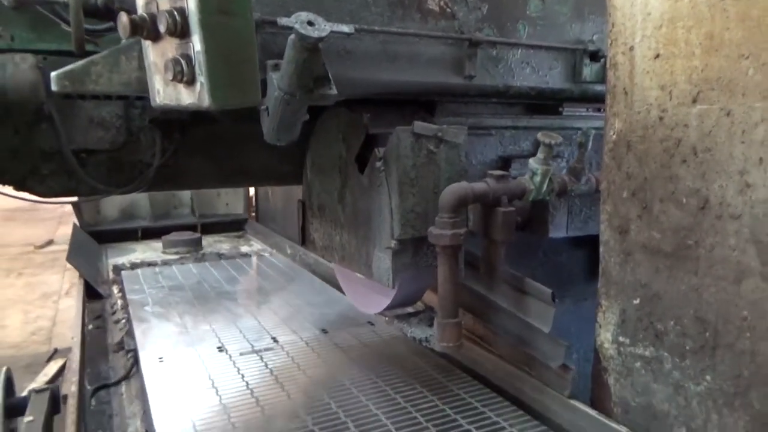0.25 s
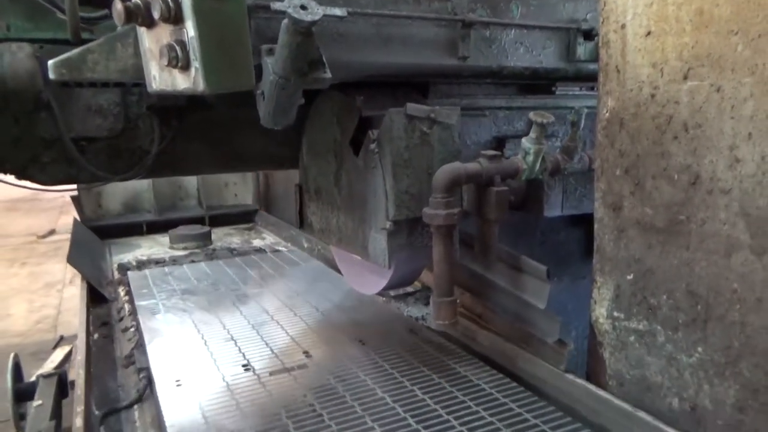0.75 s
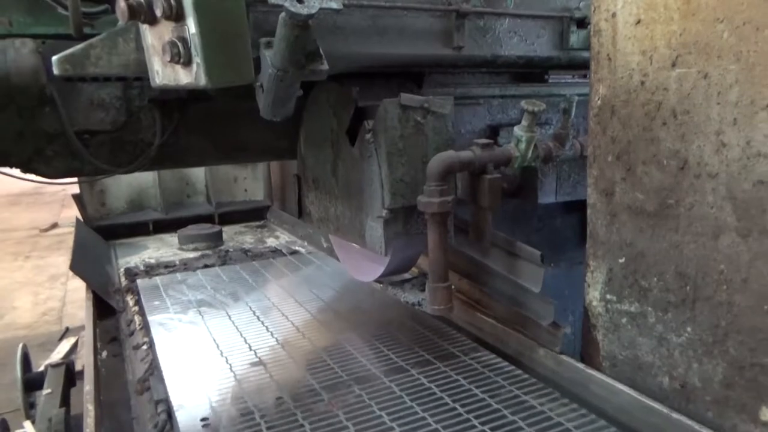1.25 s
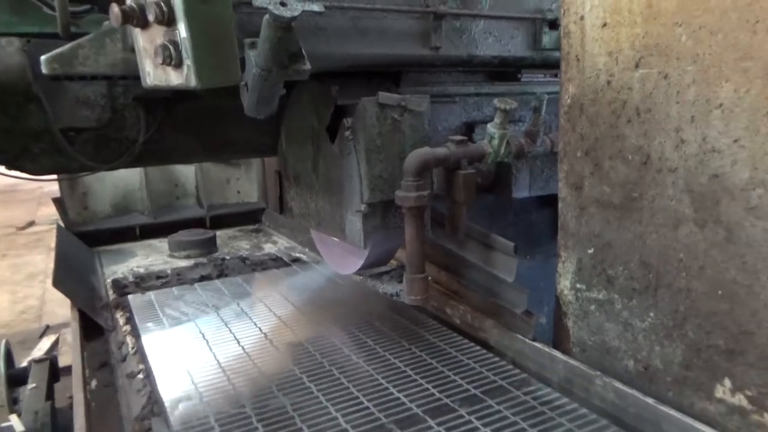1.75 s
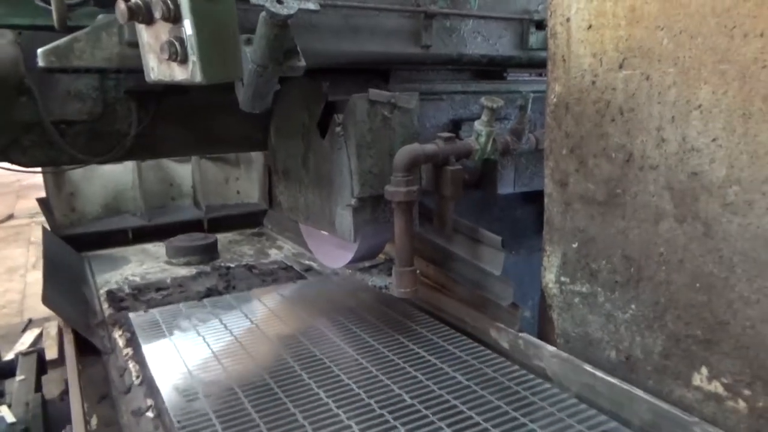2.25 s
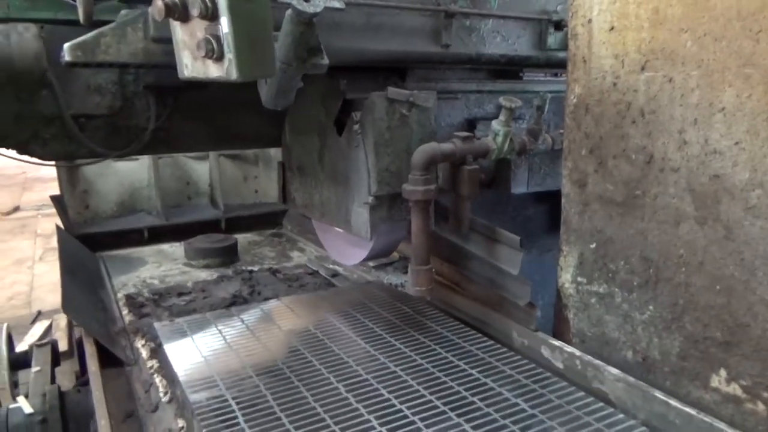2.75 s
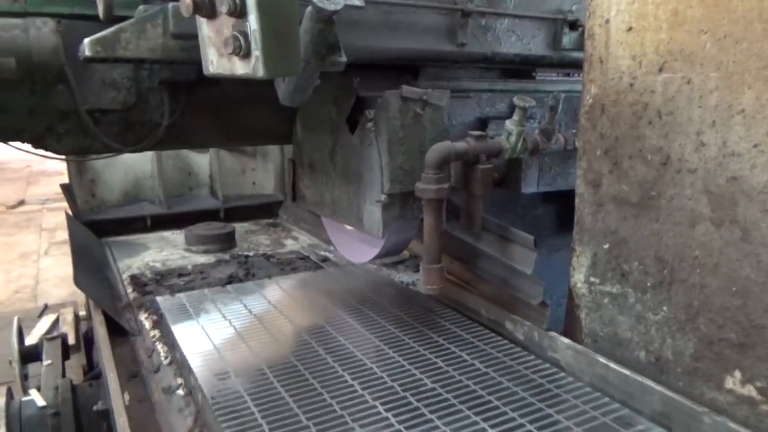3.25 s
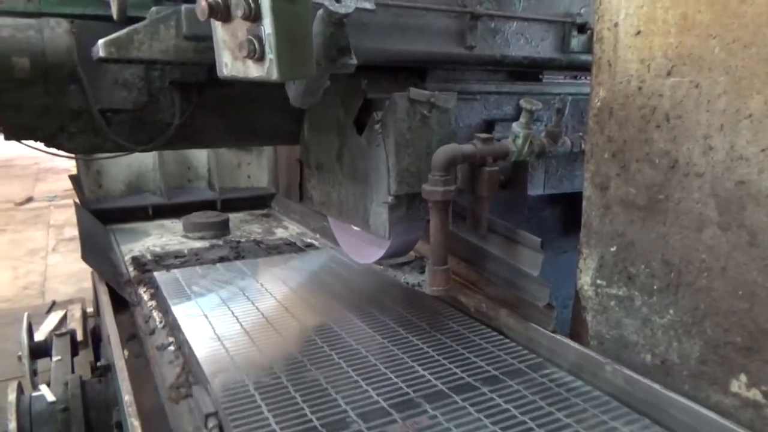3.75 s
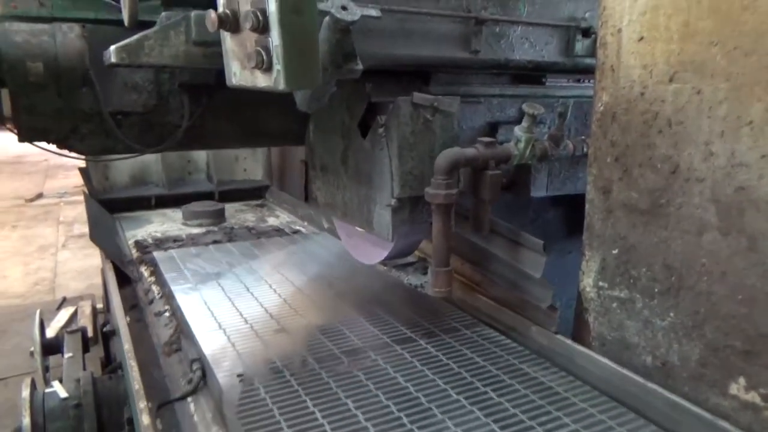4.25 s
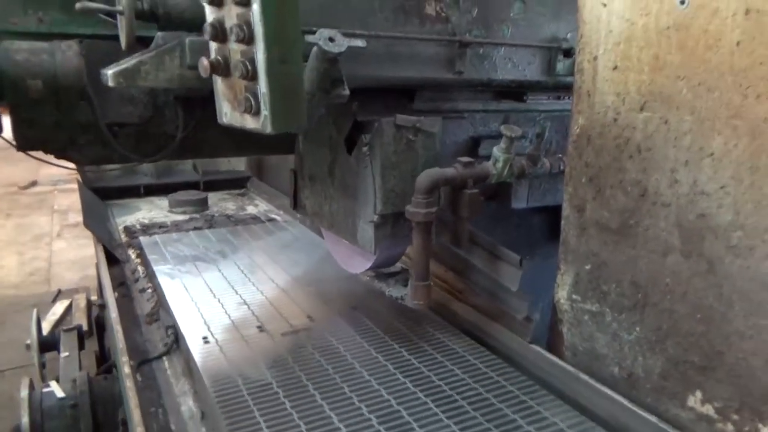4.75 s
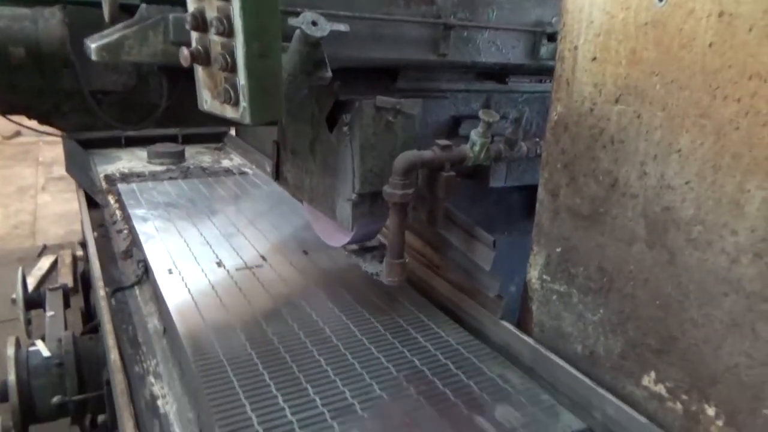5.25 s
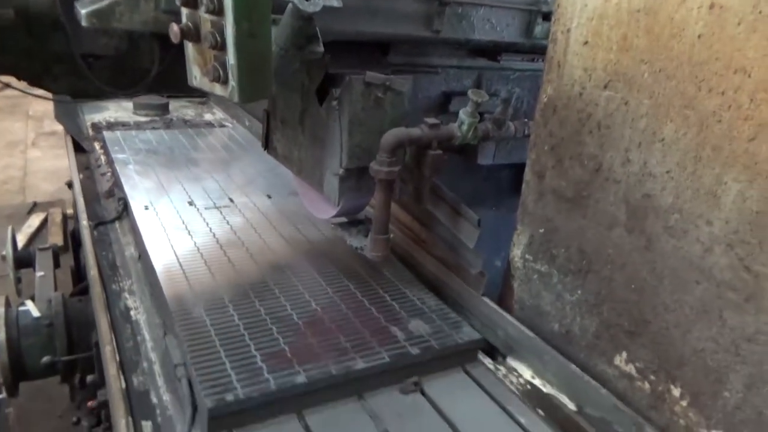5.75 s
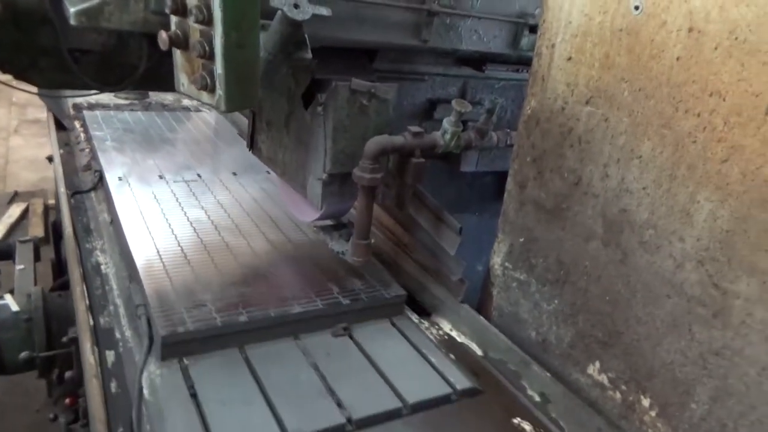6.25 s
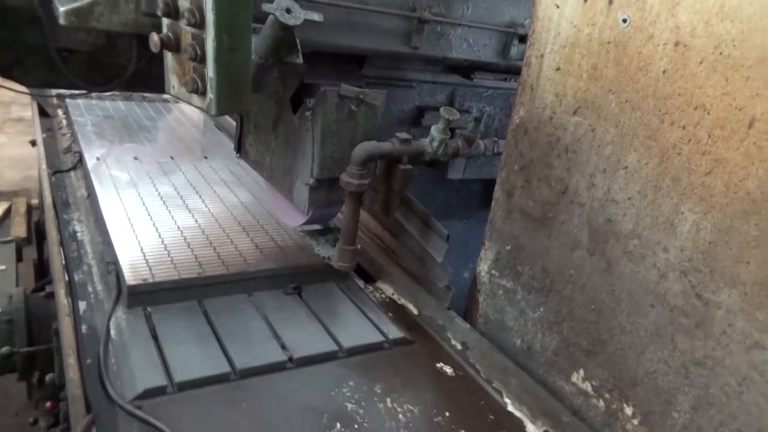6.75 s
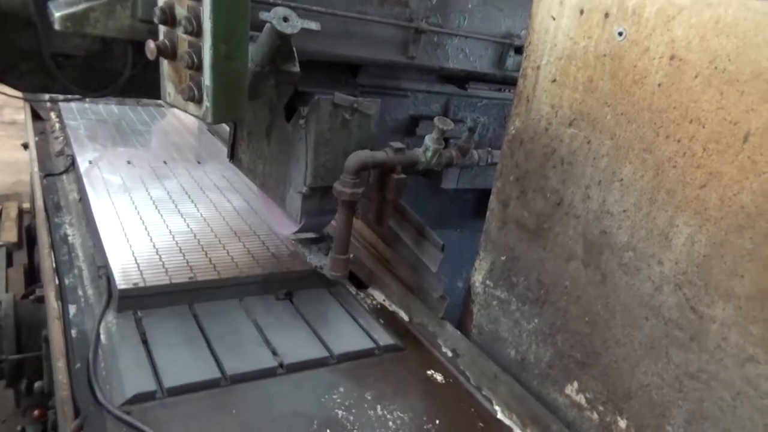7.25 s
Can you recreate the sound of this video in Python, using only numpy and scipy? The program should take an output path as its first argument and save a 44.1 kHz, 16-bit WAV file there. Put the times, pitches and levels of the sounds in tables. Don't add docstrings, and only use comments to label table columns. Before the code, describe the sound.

A big surface grinder idles in a hard, reverberant workshop while its table slides. A hydraulic pump whines steadily on many overtones that swell, fade and flutter separately. Broad hiss lies beneath. A tick and a hard knock surround a table reversal near 2.6 seconds, when the pitch jumps slightly and beats; a clack and second jump come near the end. Close stereo pickup.

```python
import sys
import numpy as np
from scipy import signal
from scipy.fft import next_fast_len
from scipy.io import wavfile
from scipy.ndimage import uniform_filter1d

SR = 44100
rng = np.random.default_rng(int(sys.argv[2]) if len(sys.argv) > 2 else 0)


def int16_out(signal):
    q = np.round(np.clip(np.atleast_2d(signal).T, -1, 1) * 32767)
    wavfile.write(sys.argv[1], SR, q.astype(np.int16))


def voltage_ratio(decibels):
    exponent = np.asarray(decibels, float) / 20
    return 10 ** exponent


N = 330309
STEP = 32
TEETH, IDLE_HZ = 13, 380.25


def read(points, hz):
    f, value = np.transpose(points)
    return np.interp(np.log(hz + 1), np.log(f + 1), value)


def evened(x):
    return x / np.sqrt(np.mean(abs(x) ** 2, -1, keepdims=True) + 1e-20)


def drift(count, size, hz):
    f = np.fft.fftfreq(size, STEP / SR)
    z = rng.standard_normal((count, size)) + 1j * rng.standard_normal((count, size))
    return evened(np.fft.ifft(z / (1 + (f / hz) ** 4)))


# time in seconds, level in dB.
GAIN = [(0, -36.5), (.04, -38.5), (.44, -36.5), (1.3, -35.5), (2.23, -35.5), (2.84, -36), (3.08, -37.5),
        (3.6, -35), (4.1, -36.5), (4.3, -40), (4.53, -36), (4.71, -38.5), (5.0, -37), (5.9, -38),
        (6.06, -42.5), (6.42, -42), (6.45, -38.5), (7.49, -36.5)]


def gain_control(t):
    seconds, db = np.transpose(GAIN)
    level_db = np.interp(t, seconds, db)
    return level_db, level_db - level_db.mean()


def bells(rows, hz, t):
    total = 0
    for s, crest_hz, db, half_s in rows:
        if abs(crest_hz - hz) < IDLE_HZ / 2:
            total = total + voltage_ratio(db) * np.exp(-((t - s) / half_s) ** 2)
    return total


# time in seconds, overtone in Hz, half length in seconds.
NODES = [(2.605, 380, 0.027), (2.835, 380, 0.026), (3.01, 380, 0.018), (3.493, 380, 0.017),
         (6.92, 380, 0.043), (7.28, 380, 0.086), (2.645, 760, .06), (2.725, 760, 0.054), (2.89, 760, 0.017),
         (7.1, 760, .015), (7.19, 760, .015), (6.96, 1140, .015), (7.1, 1140, .025), (5.79, 760, 0.03),
         (7.008, 760, 0.043), (3.02, 1140, 0.027), (3.648, 1140, 0.054), (4.25, 1140, 0.044),
         (5.838, 1140, 0.045), (7.426, 1140, 0.027), (2.02, 1520, 0.044), (2.17, 1520, .03),
         (2.8, 1520, 0.015), (6.38, 1520, .05), (3.03, 1520, 0.041), (3.23, 1520, 0.048), (3.4, 1520, .03),
         (3.86, 1520, 0.066), (5.193, 1520, 0.04), (1.75, 1900, 0.036), (3.353, 1900, 0.022),
         (3.68, 1900, 0.043), (4.55, 1900, 0.063), (5.59, 1900, 0.11), (4.4, 2280, 0.13), (4.25, 2660, .06),
         (0.48, 3040, .06), (4.9, 3040, 0.12), (6.1, 3420, .08), (5.4, 3800, 0.054), (4.6, 4180, .1),
         (0.69, 4940, .1)]


def nodes(hz, t, leak=0.24):
    factor = 1
    for s, node_hz, half_s in NODES:
        if abs(node_hz - hz) < IDLE_HZ / 2:
            passed = (t - s) / half_s
            factor = factor * (np.tanh(passed) + 1j * leak / np.cosh(passed))
    return factor


# time in
# seconds, overtone in Hz, level in dB, half length in seconds.
OVERTONE_CRESTS = [(0.16, 380, -15, 0.29), (0.83, 380, -22, 0.19), (1.25, 380, -24.0, 0.76),
                   (2.103, 380, -20.5, 0.34), (2.723, 380, -18.5, 0.15), (3.084, 380, -19, 0.38),
                   (3.746, 380, -22, 0.12), (4.216, 380, -15.5, 0.35), (4.882, 380, -20.5, 0.53),
                   (5.53, 380, -20.5, 0.13), (5.784, 380, -17.5, 0.11), (6.284, 380, -11, 0.38),
                   (6.796, 380, -26.5, 0.074), (7.08, 380, -21, 0.15), (7.444, 380, -30, 0.094),
                   (0.75, 760, -22.5, 0.92), (1.66, 760, -22, 0.51), (2.177, 760, -22, 0.26),
                   (2.53, 760, -20, 0.14), (2.9, 760, -23, 0.15), (3.8, 760, -22.0, 0.7),
                   (4.52, 760, -31, 0.087), (5.18, 760, -19.5, 0.95), (6.72, 760, -29, 0.26),
                   (6.902, 760, -27, 0.064), (7.46, 760, -28.5, 0.32),
                   (-0.1, 1140, -23, 0.26), (0.626, 1140, -21.5, 0.24), (1.268, 1140, -23.5, 0.27),
               (1.98, 1140, -28, 0.3), (2.828, 1140, -27.5, 0.06), (4.924, 1140, -26, 0.32),
               (5.645, 1140, -23.5, 0.081), (5.97, 1140, -30.5, 0.09), (6.708, 1140, -29, 0.084),
               (7.19, 1140, -30, 0.42), (0.29, 1520, -24.5, 0.59), (1.67, 1520, -27.5, 0.22),
               (2.605, 1520, -24.0, 0.21), (3.243, 1520, -22.5, 0.37), (3.635, 1520, -26.5, 0.14),
               (4.157, 1520, -31.5, 0.32), (4.57, 1520, -25, 0.08), (4.96, 1520, -28.5, 0.2),
               (5.95, 1520, -31.5, 0.28), (7.03, 1520, -34, 0.77), (7.31, 1520, -24, 0.1),
               (0.103, 1900, -31.5, 0.14), (1.1, 1900, -22.5, 0.45), (1.936, 1900, -31, 0.045),
               (2.641, 1900, -26.5, 0.12), (3.19, 1900, -19, 0.31), (4.084, 1900, -25, 0.46),
               (4.98, 1900, -28.5, 0.49), (6.89, 1900, -31, 0.99), (7.433, 1900, -31, 0.11),
                   (0.402, 2280.0, -34, 0.55), (1.0, 2280.0, -43.0, 0.07), (2.4, 2280.0, -43, 0.12),
                (3.0, 2280.0, -32.5, 0.84), (3.1, 2280.0, -40, 0.07), (3.7, 2280.0, -40, 0.12),
                (5.696, 2280.0, -27.5, 0.72), (5.7, 2280.0, -37, 0.12), (6.8, 2280.0, -36, 0.12),
                (7.1, 2280.0, -35, 0.33), (7.4, 2280.0, -35, 0.07), (0.5, 2660.0, -38, 0.2),
                (1.0, 2660.0, -37, 0.12), (1.4, 2660.0, -34.5, 1), (2.3, 2660.0, -35.0, 0.25),
                (3.3, 2660.0, -35, 0.2), (3.7, 2660.0, -39.5, 0.07), (4.5, 2660.0, -39.5, 0.12),
                (4.8, 2660.0, -44.0, 0.12), (5.8, 2660.0, -37.5, 0.85), (6.7, 2660.0, -41, 0.2),
                (0.7, 3040.0, -41, 0.07), (1.7, 3040.0, -32, 0.97), (3.5, 3040.0, -35.0, 0.13),
                (4.1, 3040.0, -42.5, 0.12), (4.5, 3040.0, -41, 0.12), (5.0, 3040.0, -37.5, 0.9),
                (5.403, 3040.0, -35, 0.23), (6.7, 3040.0, -47.0, 0.11), (7.1, 3040.0, -41, 0.55),
                (0.0, 3420.0, -40, 0.4), (0.8, 3420.0, -34.5, 0.94), (1.9, 3420.0, -36, 0.18),
                (3.6, 3420.0, -40.0, 0.33), (4.6, 3420.0, -42, 0.07), (5.1, 3420.0, -43, 0.9),
                (5.5, 3420.0, -43, 0.2), (7.0, 3420.0, -41, 0.33),
                   (0.5, 3800.0, -48, 0.36), (1.7, 3800.0, -40.5, 0.27), (3, 3800.0, -46, 0.9),
                (4.5, 3800.0, -44.0, 0.12), (5.4, 3800.0, -42, 0.1), (6.2, 3800.0, -42, 1),
                (0.2, 4180.0, -48.5, 0.33), (1.3, 4180.0, -42.5, 0.42), (3.6, 4180.0, -41.5, 0.81),
                (4.3, 4180.0, -44.0, 0.07), (4.9, 4180.0, -47.0, 0.07), (7, 4180.0, -54.5, 0.9),
                (0.2, 4560.0, -42, 0.13), (1.2, 4560.0, -44, 0.2), (1.2, 4560.0, -45, 0.9),
                (2.7, 4560.0, -46, 0.2), (3.47, 4560.0, -34, 0.33), (5, 4560.0, -43, 0.33),
                (7.1, 4560.0, -42, 0.2), (0.1, 4940.0, -39, 0.2), (0.9, 4940.0, -45, 0.9),
                (1.3, 4940.0, -45.5, 0.22), (4.1, 4940.0, -47.0, 0.9), (4.7, 4940.0, -41, 0.07),
                (6.2, 4940.0, -49, 0.9), (0.3, 5320.0, -49.0, 0.12), (1.9, 5320.0, -49, 1),
                (3.8, 5320.0, -44, 1), (5.5, 5320.0, -47, 0.33), (0.2, 5700.0, -48.0, 0.33),
                (1.3, 5700.0, -51, 0.9), (2.5, 5700.0, -54.0, 0.33), (3.9, 5700.0, -51.0, 0.9),
                (0.7, 6080.0, -55.0, 0.9), (3.5, 6080.0, -53.5, 0.2), (5.3, 6080.0, -57, 0.9),
                (1.9, 6460.0, -52.5, 0.98), (3.57, 6460.0, -40, 0.23), (5.1, 6460.0, -57.0, 0.9),
                (3.5, 6840.0, -44, 0.08), (0.85, 7220.0, -50, 0.4), (4.0, 7220.0, -49, 0.9),
                (1.2, 7600.0, -60.0, 0.9), (3.5, 7600.0, -54.0, 0.12), (5.1, 7600.0, -61.5, 0.9),
                (1.1, 7980.0, -56, 0.9), (3.5, 7980.0, -62.5, 0.55), (0.95, 7980.0, -50, 0.3)]
# frequency in Hz, level in dB.
TROUGH = [(380, -37), (760, -33.5), (1520, -35), (2280, -40), (3040, -40), (3800, -45.5), (4940, -49.5),
          (6080, -60), (7220, -69), (8000, -66)]


def standing_wave(hz, t, duck_db, flicker=0.53, flicker_hz=6.4, waver=0.27):
    trough = voltage_ratio(read(TROUGH, hz) + duck_db) * (1 + flicker * drift(1, len(t), flicker_hz)[0])
    rows = OVERTONE_CRESTS
    unrest = 1 + waver * (hz / 5000) ** 2 * drift(1, len(t), 2.8)[0]
    return (trough + bells(rows, hz, t) * unrest) * nodes(hz, t)


# frequency in Hz, level in dB.
SIDEBANDS = [(6460, -26.5), (7220, -30.5), (7600, -34.5), (8000, -31.5), (9000, -37.5), (10400, -32.5),
             (14500, -51)]


def runout_lines(k, side, t, level_db, runout=0.099, fading=0.66, fade_hz=0.79, shaft_db=1.5):
    turn = 2 * np.pi * np.arange(64) / 64
    share = np.fft.fft(np.exp(1j * k * runout * np.sin(turn)))[side] / 64
    usual = voltage_ratio(level_db + 18.5 + read(SIDEBANDS, k * IDLE_HZ)) * share
    usual = usual * voltage_ratio(shaft_db * (side != 0))
    wander = drift(len(side), len(t), fade_hz * np.sqrt(k))
    return usual * (np.sqrt(1 - fading) + np.sqrt(fading) * wander)


# time in
# seconds, overtone in Hz, level in dB, half length in seconds.
FLUTTER_CRESTS = [(0.0, 380.0, -34, 0.07), (0.7, 380.0, -43.5, 0.07), (0.8, 380.0, -40, 0.2),
                  (1.0, 380.0, -43.5, 0.07), (2.0, 380.0, -40, 0.12), (2.7, 380.0, -41, 0.95),
                  (3.0, 380.0, -45.0, 0.12), (4.8, 380.0, -37, 0.31), (5.6, 380.0, -41, 0.2),
                  (6.4, 380.0, -39.5, 1), (6.7, 380.0, -42, 0.12), (7.4, 380.0, -40.5, 0.07),
                  (0.3, 760.0, -48.0, 0.22), (1.5, 760.0, -43, 0.78), (2.4, 760.0, -46, 0.2),
                  (4.0, 760.0, -45, 0.18), (4.6, 760.0, -42.0, 0.9), (5.8, 760.0, -43, 0.2),
                  (6.6, 760.0, -54.0, 0.55), (1.3, 1140.0, -40, 0.33), (2.9, 1140.0, -40, 0.9),
                  (3.4, 1140.0, -41.5, 0.12), (5.1, 1140.0, -47, 0.33), (7.1, 1140.0, -47, 1),
                  (1.4, 1520.0, -45.5, 0.33), (3.4, 1520.0, -44, 0.9), (4.6, 1520.0, -45, 0.2),
                  (5.6, 1520.0, -48.5, 0.12), (7.4, 1520.0, -48, 0.9), (0.1, 1900.0, -48.5, 0.33),
                  (1.4, 1900.0, -38, 0.29), (3.4, 1900.0, -43, 0.9), (4.2, 1900.0, -42.5, 0.12),
                  (5.3, 1900.0, -48, 0.12), (6.0, 1900.0, -47, 0.2), (7.1, 1900.0, -36, 0.59),
                  (0.7, 2280.0, -49.0, 0.55), (1.9, 2280.0, -40, 1), (3.5, 2280.0, -39, 0.55),
                  (5.3, 2280.0, -45, 0.33), (7.0, 2280.0, -44, 0.6), (0.8, 2660.0, -45, 0.9),
                  (2.1, 2660.0, -52.5, 0.55), (3.3, 2660.0, -43.5, 0.2), (5.4, 2660.0, -44, 0.9),
                  (0.3, 3040.0, -36, 0.73), (2.2, 3040.0, -36, 0.55), (3.8, 3040.0, -41.0, 0.2),
                (5.102, 3040.0, -45, 0.33), (6.1, 3040.0, -45, 0.9), (6.8, 3040.0, -37, 0.24),
                (1.7, 3420.0, -39, 1), (3.4, 3420.0, -42.0, 0.07), (3.9, 3420.0, -43, 0.55),
                (5.7, 3420.0, -45.0, 0.12), (6.0, 3420.0, -48, 0.9), (6.8, 3420.0, -42, 0.12),
                (0.7, 3800.0, -45.0, 0.9), (2.3, 3800.0, -46.5, 0.2), (3.303, 3800.0, -42, 0.07),
                (3.6, 3800.0, -46.5, 0.9), (5.1, 3800.0, -45.0, 0.33), (6.2, 3800.0, -50, 0.2),
                (1.101, 4180.0, -42.0, 0.12), (1.5, 4180.0, -47, 0.9), (3.1, 4180.0, -51.0, 0.55),
                (5.3, 4180.0, -53, 0.9), (6.9, 4180.0, -45.0, 0.2), (0.3, 4560.0, -49, 0.9),
                (1.4, 4560.0, -44, 0.2), (2.4, 4560.0, -47, 0.2), (3.3, 4560.0, -43, 0.14),
                (4.5, 4560.0, -42, 0.9), (5.5, 4560.0, -43, 0.2), (7.0, 4560.0, -46, 0.2),
                (0.5, 4940.0, -52, 0.55), (2.4, 4940.0, -41, 0.07), (2.5, 4940.0, -44, 0.9),
                (3.3, 4940.0, -43, 0.12), (4.1, 4940.0, -50.0, 0.33), (5.5, 4940.0, -42.5, 0.55),
                (1.2, 5320.0, -42, 0.46), (4.5, 5320.0, -51, 0.9), (6.2, 5320.0, -55.5, 0.9),
                (0.4, 5700.0, -46.0, 0.9), (2.1, 5700.0, -53.5, 0.55), (3.402, 5700.0, -52.0, 0.88),
                (5.7, 5700.0, -46.0, 0.2), (0.7, 6080.0, -51, 0.9), (3.5, 6080.0, -43, 0.33),
                (4.6, 6080.0, -43, 0.12), (5.2, 6080.0, -47, 0.9), (1.5, 6460.0, -47.5, 0.9),
                (4.1, 6460.0, -41, 0.7), (6.0, 6460.0, -53, 0.49)]
# frequency in Hz, level in dB.
FLUTTER_TROUGH = [(380, -39.5), (1140, -45.5), (1900, -39), (2280, -41.5), (2660, -45), (3040, -38.5),
                  (3800, -43.5), (4560, -42.5), (5700, -48), (6460, -46)]


def flutter(lines, side, hz, t, duck_db):
    power = uniform_filter1d((abs(lines) ** 2 * (side != 0)).sum(0), size=200)
    height = voltage_ratio(read(FLUTTER_TROUGH, hz) + duck_db) + bells(FLUTTER_CRESTS, hz, t)
    return lines * height / np.sqrt(power)


# frequency in Hz, level in dB.
SKIRT = [(380, -55), (1900, -47), (3400, -48.5), (6500, -53), (9000, -62), (15000, -80)]


def tooth_jitter(hz, t, duck_db, skirt_hz=55):
    return voltage_ratio(read(SKIRT, hz) + duck_db) * drift(1, len(t), skirt_hz)[0]


# frequency in Hz, side-to-mid ratio in dB.
APART = [(380, -10), (760, -13.5), (1140, -3), (2400, -10), (6000, -9.5), (8500, -10.5), (15000, -30)]
# time in seconds, left-to-right ratio in dB.
SWING = [(0.0, 1), (0.64, -7.5), (1.23, 10), (1.56, -5.5), (2.21, 1.5), (2.44, 15), (2.61, -3.0), (2.77, 4),
         (3.52, -4), (3.82, 10), (4.69, -4.5), (5.17, 7), (5.44, 1), (5.65, 10), (6.05, 5.5), (7.18, 5.5),
         (7.34, 2), (7.49, 6)]


def port_difference(k, t):
    if k > 1:
        return voltage_ratio(read(APART, k * IDLE_HZ)) * drift(9, len(t), 1.1)
    seconds, lean_db = np.transpose(SWING)
    ratio = voltage_ratio(np.interp(t, seconds, lean_db)) * np.exp(-.55j)
    return (ratio - 1) / (ratio + 1)


def pump(group_db=1.5, unload_db=-5):
    size = next_fast_len(N // STEP + 2)
    t, fine = np.arange(size) * STEP / SR, np.arange(N) / SR
    echo = reversal(t)[1]
    angle = 2 * np.pi * np.cumsum(reversal(fine)[0]) / SR
    shaft = np.interp(t, fine, angle) / TEETH
    ahead = TEETH * shaft - 2 * np.pi * IDLE_HZ * np.minimum(t, fine[-1])
    level_db, duck_db = gain_control(t)
    side = np.arange(-4, 5)[:, None]
    out = np.zeros((2, N))
    for k in range(1, 40):
        hz = k * IDLE_HZ
        guard_db = 2.5 if k <= 9 else 1.5
        lines = runout_lines(k, side, t, level_db + guard_db)
        if k <= 17:
            lines = flutter(lines, side, hz, t, duck_db)
        lines *= voltage_ratio(group_db * drift(1, size, 7.4).real)
        if k <= 21:
            lines[4] = standing_wave(hz, t, duck_db)
        if k > 15:
            lines *= voltage_ratio(unload_db * echo)
        lines[4] += tooth_jitter(hz, t, duck_db)
        if k == 1:
            lines[3] *= voltage_ratio(1.7)
            lines[5] *= voltage_ratio(-2.5)
        lines *= echo_beat(k, echo, ahead, t)
        start = rng.uniform(0, 2 * np.pi, side.shape)
        lines *= np.sqrt(2) * np.exp(1j * (side * shaft + start))
        apart = port_difference(k, t)
        cos, sin = np.cos(k * angle), np.sin(k * angle)
        for port, sign in enumerate((1, -1)):
            slow = (lines * (1 + sign * apart)).sum(0)
            out[port] += np.interp(fine, t, slow.real) * cos
            out[port] -= np.interp(fine, t, slow.imag) * sin
    return out, angle


# frequency in Hz, density in dB per Hz.
WASH = [(20, -16), (40, -19), (62, -21), (100, -10.5), (165, -1.5), (550, -2), (950, -6.5), (1700, -6),
        (3200, -9), (6600, -14.5), (8200, -17.5), (10800, -14), (13000, -17), (15500, -25.5)]
# frequency in Hz, left-right correlation (0-1).
SAME = [(60, 0.88), (250, 1), (1000, 0.72), (4000, 0.72), (6500, 0.8), (8500, 1), (15000, 0.95)]
# frequency in Hz, left-to-right ratio in dB.
LEAN = [(60, 7), (180, 5), (550, -1), (1650, -4), (5000, -3), (15000, 0)]


def wash(angle, patchy_db=0.87, tooth=0.14, turn=0.11, follow_hz=900, rush_db=3.0, swell_db=1.3):
    frames, hz = N // 256 + 5, np.fft.rfftfreq(1024, 1 / SR)
    a, b, c, d, patches = rng.standard_normal((frames, 513, 5)).T
    patches = evened(uniform_filter1d(uniform_filter1d(patches, 12, 0), 14, 1))
    same = np.clip(read(SAME, hz), -1, 1)[:, None]
    left, other = a + 1j * b, c + 1j * d
    z = np.array([left, same * left + np.sqrt(1 - same ** 2) * other])
    rush = read([(150, 0.0073), (400, 0.37), (4000, 0.95), (8000, 0)], hz)[:, None]
    z *= voltage_ratio(rush_db * reversal(np.arange(frames) * 256 / SR)[1] * rush)
    gusts = rng.standard_normal((513, frames))
    gusts = evened(uniform_filter1d(uniform_filter1d(gusts, 150, 0), 12, 1))
    z *= voltage_ratio(swell_db * gusts)
    lean_db = np.array([.5, -.5])[:, None, None] * read(LEAN, hz)[:, None]
    z *= voltage_ratio(read(WASH, hz)[:, None] + patchy_db * patches + lean_db)
    x = signal.istft(z, nperseg=1024, noverlap=768)[1][:, :N]
    x = x / np.sqrt(np.mean(x ** 2))
    high = signal.sosfilt(signal.butter(2, follow_hz, "high", fs=SR, output="sos"), x)
    shaft = angle / TEETH
    x = x + high * (tooth * np.cos(angle) + turn * np.cos(shaft) + 0.11 * np.cos(2 * shaft))
    return voltage_ratio(-28 + gain_control(np.arange(N) / SR)[1]) * x


# frequency in Hz, level in dB, start in seconds, end in seconds.
MOTOR = [
    (656.8, -41, 2.6, 3.2),
    (656.8, -43, 4.4, 5.9),
    (656.8, -34, 6.95, 8),
    (1357, -43, .35, 1.25),
    (1357, -42, 4.55, 5.3),
    (1378, -49, 1, 8),
    (1378, -44, 2.75, 3.7),
    (102, -47, .8, 2.2),
]


def motor():
    t = np.arange(N) / SR
    sway = drift(len(MOTOR), N // STEP + 2, 2.4)
    slow, out = np.arange(sway.shape[1]) * STEP / SR, np.zeros(N)
    for (hz, db, start, end), w in zip(MOTOR, sway):
        on = np.clip(np.minimum(t - start + 0.1, end - t) / 0.14, 0, 1)
        height = np.interp(t, slow, 1.0 + 0.3 * w.real)
        phase = np.interp(t, slow, w.imag)
        out += voltage_ratio(db) * on * height * np.sin(2 * np.pi * hz * t + phase)
    return out


# start in seconds, level in dB, centre in Hz, bandwidth in Hz, 60 dB decay in seconds.
KNOCKS = [
    (0.779, -29, 165, 70, 0.28),
    (2.114, -24, 10500, 5000, .07),
    (2.11, -23.5, 2100, 1600, .22),
    (2.884, -20, 530, 160, 0.35),
    (2.89, -29.5, 217, 120, 0.43),
    (3.9, -46, 70, 30, 0.98),
    (4.802, -35, 160, 70, 0.48),
    (6.437, -29, 1500, 1200, .2),
    (6.436, -26, 9500, 7000, .04),
    (6.85, -55, 50.5, 30, 2.7),
]


def knocks():
    out, t = np.zeros(N), np.arange(SR) / SR
    for s, db, hz, width_hz, t60 in KNOCKS:
        edges = [max(hz - width_hz / 2, 30), hz + width_hz / 2]
        band = signal.butter(2, edges, "band", fs=SR, output="sos")
        burst = evened(signal.sosfilt(band, rng.standard_normal(len(t)))) * voltage_ratio(db - 60 * t / t60)
        burst *= np.minimum(t * np.sqrt(hz) / 0.2, 1)
        part = out[round(s * SR):][:len(t)]
        part += burst[:len(part)]
    return out


# time in seconds, jump of tooth rate in Hz, echo share of each line (0-1).
REVERSALS = [
    (2.57, 7.5, .8),
    (6.98, 6.5, .8),
]


def reversal(t, jump_s=.05, hold_s=.15, settle_s=.19, lead_s=0.048, rise_s=0.1, echo_s=1.11):
    hz, echo = IDLE_HZ + 0 * t, 0 * t
    for s, jump_hz, share in REVERSALS:
        after = t - s
        relax = np.exp(-np.maximum(after - jump_s - hold_s, 0) / settle_s)
        hz = hz + jump_hz * np.clip(after / jump_s, 0, 1) * relax
        after = after + lead_s
        echo = echo + share * np.clip(after / rise_s, 0, 1) * np.clip(1 - (after / echo_s) ** 2, 0, 1)
    return hz, np.clip(echo, 0, 1)


def hall(offset, t, t60):
    tail = (rng.standard_normal((9, len(t), 2)) @ [1, 1j]) * voltage_ratio(-60 * t / t60)
    tail /= np.linalg.norm(tail, axis=1, keepdims=True)
    return np.fft.ifft(np.fft.fft(tail) * np.fft.fft(offset)) / offset


def echo_beat(k, echo, ahead, t, hall_t60=1.96):
    heard = echo * min(k / 4, 1) ** 2
    beat = np.sqrt(1 - heard) + np.sqrt(heard) * hall(np.exp(1j * k * ahead), t, hall_t60)
    slow_power = uniform_filter1d(abs(beat) ** 2, size=110)
    return beat / np.sqrt(slow_power + 0.071)


def scene():
    tones, angle = pump()
    return tones + wash(angle) + motor() + knocks() * voltage_ratio([[1.5], [-1.5]])


def top_cut(x):
    return signal.sosfilt(signal.butter(12, 15720, fs=SR, output="sos"), x)


def record(dry):
    return top_cut(dry)


dry = scene()
out = record(dry)
int16_out(out)
```